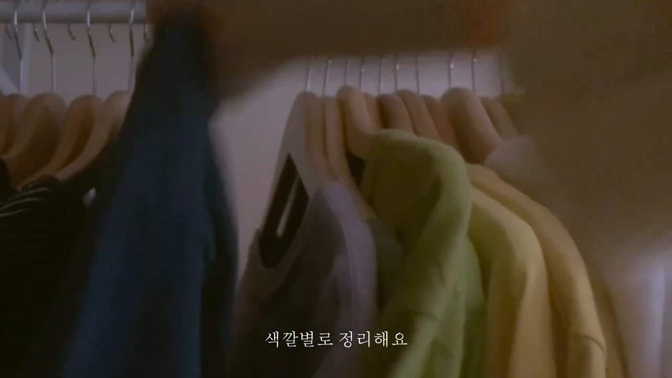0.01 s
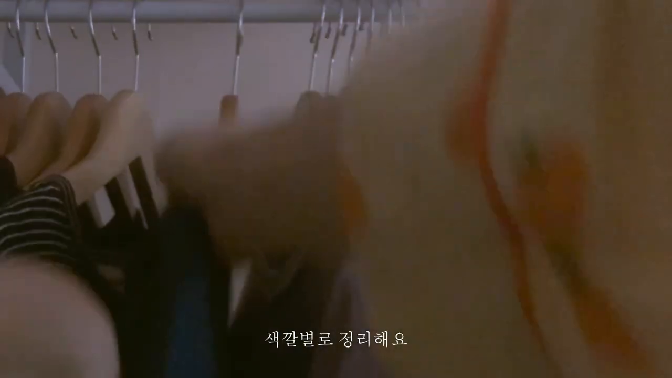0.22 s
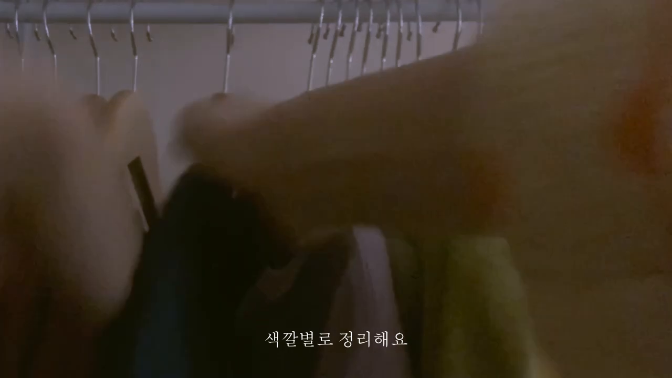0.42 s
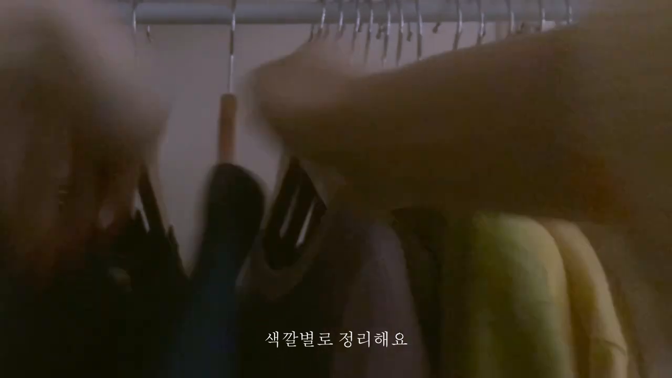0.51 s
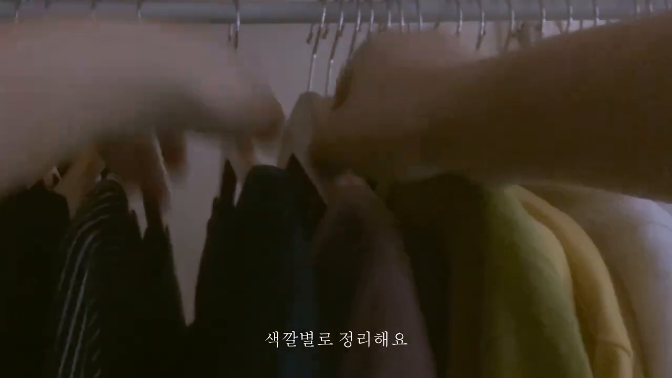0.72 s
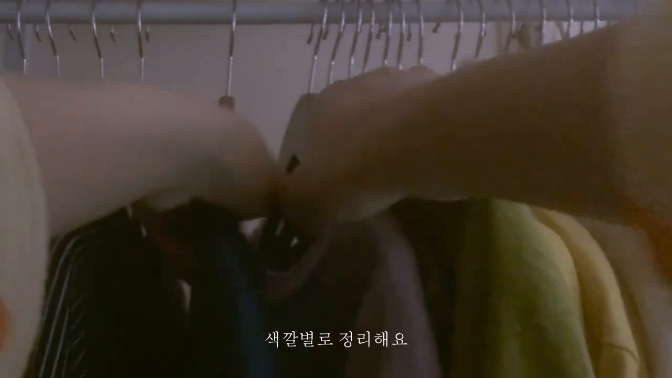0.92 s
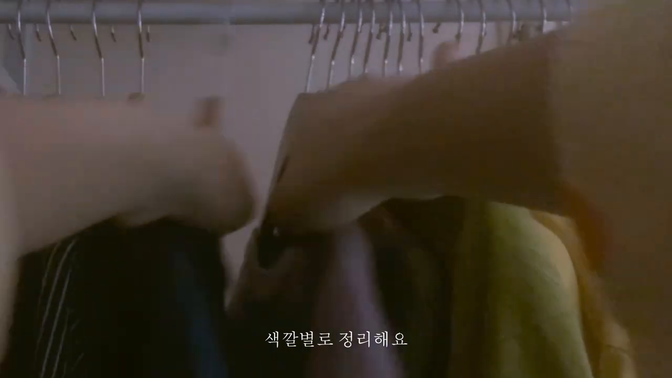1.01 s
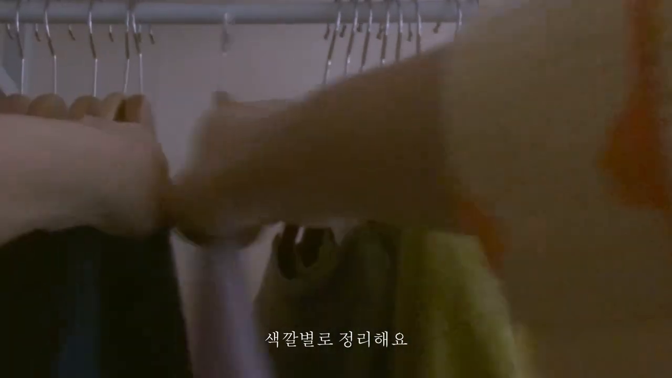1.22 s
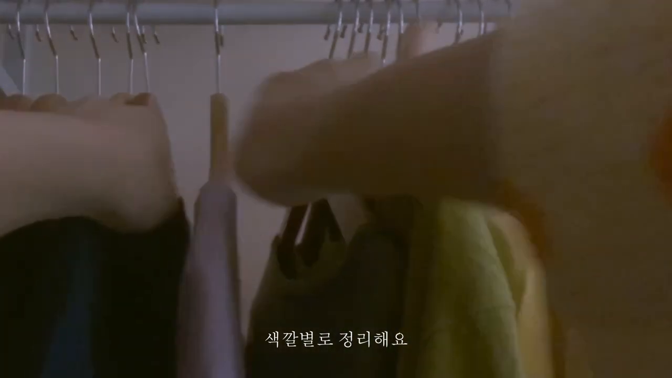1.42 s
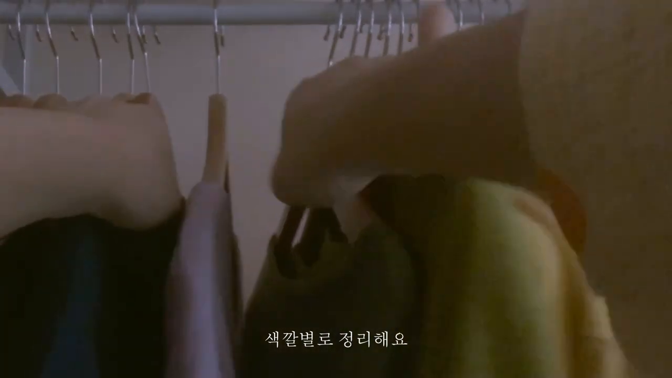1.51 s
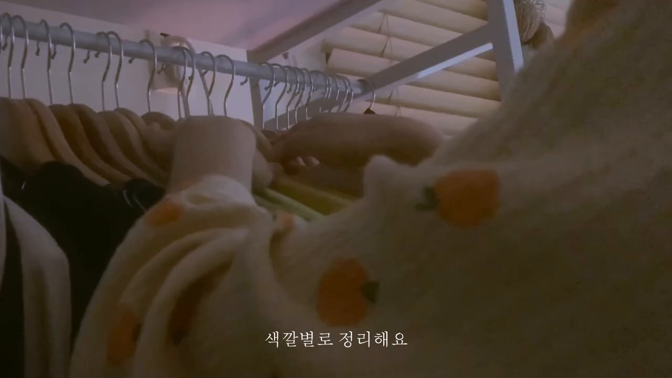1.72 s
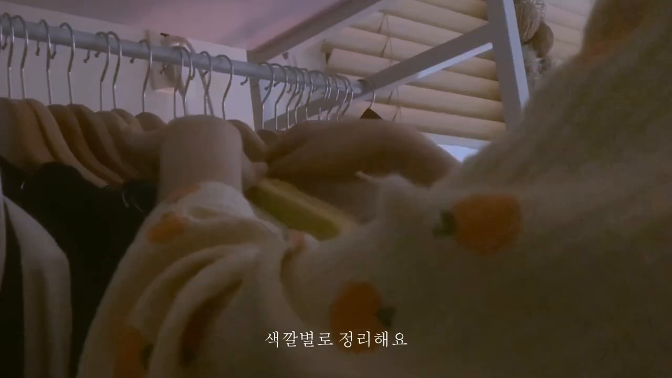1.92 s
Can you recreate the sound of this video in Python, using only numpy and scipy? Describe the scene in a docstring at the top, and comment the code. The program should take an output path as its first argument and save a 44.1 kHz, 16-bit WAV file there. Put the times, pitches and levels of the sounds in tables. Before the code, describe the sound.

Wooden clothes hangers are pushed along a metal rail, heard close in a small room. Hooks tick and a loud, hollow clack lands at 0.23 s, with weaker knocks near 0.45 and a dull tap at 0.56. A hook scrapes and clinks around 1.1, scraping again before a cushioned knock at 1.25. Cloth rustles, faint taps follow near 1.5 and 1.9; low air rush dips briefly at 1.79.

```python
"""Hangers on a rail

In a small room, close to the microphones, wooden hangers are pushed along a metal clothes rail.
Steel hooks tick just before wooden shoulders clack: noise cracks over damped sines, with a low hollow ring.
A hook scrapes along the rail (random slips through resonances) and clinks; cloth-cushioned taps are duller.
Clothes bump and rustle as shaped noise over a low rush of air and faint hiss, whose level dips briefly.
All but the clothes and the air excite a diffuse room tail."""
import sys
import numpy as np
from scipy import signal
from scipy.fft import rfft, irfft
from scipy.io import wavfile

SR = 44100
rng = np.random.default_rng(int(sys.argv[2]) if len(sys.argv) > 2 else 0)


def to_wav(s):
    """Save 16-bit WAV."""
    ch = np.atleast_2d(s).T  # columns
    pcm = np.round(np.clip(ch, -1, 1) * 32767)  # PCM
    wavfile.write(sys.argv[1], SR, pcm.astype(np.int16))


N = 88200
T = np.arange(N) / SR
FREQS = np.maximum(np.arange(N // 2 + 1) * SR / N, 1)
LEFT_RIGHT = np.array([[1], [-1]])
RIGHT_ONLY = np.array([[0], [1]])


def from_db(db):
    """Decibels to gain."""
    return 10 ** (np.asarray(db) / 20)


def rms_one(x):
    """Scale to unit rms."""
    return x / np.sqrt(np.mean(x ** 2) + 1e-20)


def at_hz(points, hz):
    """Read a table on a log-frequency axis."""
    points = np.array(points)
    return np.interp(np.log(hz), np.log(points[:, 0]), points[:, 1])


def pan(db):
    """Left and right gains for a level difference."""
    return from_db(db * LEFT_RIGHT / 2)


def noise(spectrum, likeness, tilt_db=0, lag_s=0):
    """Coloured stereo noise, rms 1, reaching the right microphone lag_s after the left."""
    mid, side = rfft(rng.standard_normal((2, N)))
    alike = np.clip(at_hz(likeness, FREQS), -1, 1)
    stereo = np.sqrt(1 + alike) * mid + np.sqrt(1 - alike) * side * LEFT_RIGHT
    colour = from_db(at_hz(spectrum, FREQS) + tilt_db * np.log2(FREQS))
    delay = np.exp(-2j * np.pi * FREQS * RIGHT_ONLY * lag_s)
    return rms_one(irfft(colour * delay * stereo, N))


def decay(start, t60, attack_s):
    """A quick rise and an exponential fall of 60 dB per t60."""
    age = np.maximum(T - start, 0)
    fall = from_db(-60 * np.minimum(age / t60, 5))
    return (1 - np.exp(-age / attack_s)) * fall


MODE_PAN_DB = 1  # random level difference per mode, multiplied by the phase scatter


def struck(start, modes, lag_s, attack_s, tilt_db=0, scatter=0):
    """Damped sines from one contact; scatter [rad per kHz] varies phase at the right microphone, and level."""
    age = T - start - RIGHT_ONLY * lag_s
    centre = np.mean([mode[0] for mode in modes])
    out = 0
    for hz, db, t60 in modes:
        turn, side = rng.standard_normal(2)
        phase = RIGHT_ONLY * turn * scatter * hz / 1000
        gain = from_db(db + tilt_db * np.log2(hz / centre)) * pan(side * scatter * MODE_PAN_DB)
        out = out + gain * decay(start, t60, attack_s) * np.sin(2 * np.pi * hz * age + phase)
    return out


def resonate(x, hz, width_hz):
    """One driven resonance, rms 1."""
    r = np.exp(-np.pi * width_hz / SR)
    feedback = [1, -2 * r * np.cos(2 * np.pi * hz / SR), r * r]
    return rms_one(signal.lfilter([1, 0, -1], feedback, x + 1e-18))


# Rush of air: (frequency [Hz], relative density [dB per Hz])
AIR = [(20, -37.5), (35, -20), (56, 4), (110, -6), (160, 2.5), (220, -8.5), (350, -7), (700, -13.5),
       (1400, -20), (2400, -32.5), (6000, -43.5), (16000, -71)]
# Faint hiss, which dips less than the rush: (frequency [Hz], relative density [dB per Hz])
HISS = [(500, -5.5), (2400, 0), (6000, -5.5), (9500, 2.5), (11500, -11), (14000, -1.5), (16000, -13)]
# Background level, with a brief dip: (time [s], level change [dB])
AIR_LEVEL = [(0, 2), (.8, 0), (1.4, 2), (1.772, -0.5), (1.789, -27), (1.812, -2), (2, 0.5)]
# Likeness of the background at the two microphones: (frequency [Hz], likeness [-1 to 1])
AIR_LIKENESS = [(40, .87), (130, .75), (250, .65), (800, .45), (2500, .1), (10000, .2)]
AIR_DB, HISS_DB = -60, -80.5
HISS_DIP_SHARE = 0.34  # part of the level change [dB] that the hiss follows
AIR_LAG_S = .00018


def air():
    """The low rush and faint hiss are coloured noises; the hiss follows the level changes and dip only partly."""
    level_db = np.interp(T, *np.transpose(AIR_LEVEL))
    rush = from_db(AIR_DB + level_db) * noise(AIR, AIR_LIKENESS, lag_s=AIR_LAG_S)
    hiss = from_db(HISS_DB + HISS_DIP_SHARE * level_db) * noise(HISS, AIR_LIKENESS)
    return rush + hiss


# Hooks tick against each other: (time [s], level [dB], steel ring level [dB])
TICKS = [(0.2252, -17, -17), (0.2269, -23, -25), (0.447, -36, -61), (0.463, -36, -64), (1.8915, -45.5, -65)]
# Dense, short-lived hook modes: (frequency [Hz], relative density [dB per Hz])
HOOK_CRACK = [(500, -18.5), (1500, -7.5), (3200, -3.5), (5500, -12.5), (8000, -1), (9400, 1.5), (10500, 0),
              (11400, -24), (12600, -4), (14500, -6.5), (16000, -18)]
# High ring of the steel hooks: (frequency [Hz], level [dB], 60 dB decay time [s])
HOOK_MODES = [(8400, -9, .025), (8750, -7, .03), (9041, -3, .04), (9200, -8, .035), (9364, -2, .04),
              (9600, -8, .03), (9904, -2, .04), (10250, -9, .025)]
# Likeness of a tick at the two microphones: (frequency [Hz], likeness, limited to [-1 to 1])
TICK_LIKENESS = [(500, -0.075), (1400, -1.1), (3000, -1.1), (6000, -0.47), (8300, 0.99), (10300, 0.97),
                 (13000, 0)]
TICK_SNAP_T60_S, TICK_T60_S, TICK_TAIL_DB = .007, .04, -9  # tail level relative to the snap


def hook_ticks():
    """Steel wire on steel wire: a sharp tick with a softer tail and a very high ring."""
    out = 0
    for s, db, ring_db in TICKS:
        snap = decay(s, TICK_SNAP_T60_S, .0002)
        tail = from_db(TICK_TAIL_DB) * decay(s, TICK_T60_S, 0.0015)
        crack = from_db(db) * noise(HOOK_CRACK, TICK_LIKENESS) * (snap + tail)
        out = out + crack + from_db(ring_db) * struck(s, HOOK_MODES, 0, .0004)
    return out


# Reverberation time: (frequency [Hz], 60 dB decay time [s])
ROOM_T60 = [(150, 1), (550, 0.65), (1900, 0.34), (3200, 0.39), (6000, 0.3), (9500, 0.27), (15000, 0.23)]
# Reverberation colour: (frequency [Hz], level [dB])
ROOM_COLOUR = [(150, 0.5), (400, 4.5), (550, -2), (1000, -1), (2000, -1.5), (3200, 1), (5000, 3),
               (9500, -1.5), (11600, -6), (14000, 2)]
# Likeness of the tail at the two microphones: (frequency [Hz], likeness [-1 to 1])
ROOM_LIKENESS = [(150, 1), (550, 0.69), (1300, -0.3), (5000, 0.067), (9500, 0.27), (14000, 0.35)]


def room(x):
    """A diffuse tail of noise that dies at its own rate in each band."""
    edges = np.geomspace(100, 18000, 14)
    t, response = T[:SR], 0
    diffuse = [noise(ROOM_COLOUR, ROOM_LIKENESS)[:, :SR] for _ in range(2)]
    for k, (low, high) in enumerate(zip(edges, edges[1:])):
        band_filter = signal.butter(2, [low, high], "band", fs=SR, output="sos")
        band = signal.sosfilt(band_filter, diffuse[k % 2])  # neighbouring bands use separate noises
        t60 = at_hz(ROOM_T60, np.sqrt(low * high))
        fall = np.exp(-np.log(1000) * t / t60) * (1 - np.exp(-t / .004))
        response = response + band * fall / np.linalg.norm(fall)
    return signal.fftconvolve(x, response, axes=1)[:, :N]


# Wooden shoulders meet, and at 1.105 s the hanger rings as its hook lands on the rail: (time [s], crack level
# [dB], wood ring level [dB], hollow ring level [dB], # neighbour's ring level [dB], treble tilt [dB per
# octave])
KNOCKS = [(0.229, -22.5, -23, -24, -53, -2.5), (0.233, -20, -23, -15, -42, -2.5),
          (0.2418, -27, -31.5, -45, -49, 7), (.4475, -35, -39.5, -47, -55, 3),
          (.456, -43.5, -42.5, -40.5, -53, -0.5), (.4655, -33.5, -38.5, -35.5, -38.5, 1.5),
          (1.105, -53, -37, -53.5, -49.5, 2.5), (1.259, -43.5, -47.5, -44, -52, -1.5),
          (1.774, -66.5, -80, -91, -80, 5)]
# Dense, short-lived wood modes: (frequency [Hz], relative density [dB per Hz])
WOOD_CRACK = [(150, -30), (400, -5), (700, -4.5), (1400, -4.5), (1950, -10.5), (2600, 1.5), (3250, -0.5),
              (4100, -11.5), (7000, -12.5), (10000, -17.5), (11500, -33), (14500, -31.5)]
# Bright wood ring: (frequency [Hz], level [dB], 60 dB decay time [s])
WOOD_MODES = [(1098, -9, .09), (1304, -9.5, .13), (1375, -17, .06), (1650, -12, .06), (1770, -15, .06),
              (2162, -11.5, .1), (2514, -10, .12), (2609, -11, .12), (2705, -15, .16), (2977, -14, .16),
              (3169, -14, .17), (3290, -15, .2), (3805, -24, .16)]
# Ring of the neighbouring hanger: (frequency [Hz], level [dB], 60 dB decay time [s])
NEIGHBOUR_MODES = [(421, -9, .12), (923, -3, .2), (1062, -3, .14), (1825, -9, .08), (2400, -8, .07),
                   (2690, -4, .1), (2985, -3, .14), (3250, -5, .08), (3318, 0, .13), (3790, -6, .08),
                   (3928, -8, .06), (4860, -14, .05), (6897, -8, .04)]
# Likeness of the wood noise at the two microphones: (frequency [Hz], likeness [-1 to 1])
WOOD_LIKENESS = [(100, 0.28), (500, .8), (1300, 0.18), (3000, 0.13), (9000, .1)]
WOOD_T60_S, WOOD_LAG_S = 0.064, 0.00018
PHASE_SCATTER_PER_KHZ = 0.42  # radians per kHz


def wood_knocks():
    """Each clack is a short crack, the bright wood modes and the ring of the neighbouring hanger."""
    out = 0
    for s, crack_db, ring_db, _, neighbour_db, tilt_db in KNOCKS:
        crack = noise(WOOD_CRACK, WOOD_LIKENESS, tilt_db, WOOD_LAG_S) * decay(s, WOOD_T60_S, .0015)
        ring = struck(s, WOOD_MODES, WOOD_LAG_S, 0.0015, tilt_db, PHASE_SCATTER_PER_KHZ)
        neighbour = struck(s, NEIGHBOUR_MODES, WOOD_LAG_S, .003, scatter=PHASE_SCATTER_PER_KHZ)
        out = out + from_db(crack_db) * crack + from_db(ring_db) * ring + from_db(neighbour_db) * neighbour
    return out


# Bending modes of the whole hanger: (frequency [Hz], level [dB], 60 dB decay time [s])
HOLLOW_MODES = [(316, -22, .2), (385, -28, .22), (440, -24, .2), (500, -10, .05), (555, 0, .105),
                (549, -15, .3), (592, -20, .2), (635, -11, .07), (690, -20, .14), (724, -20, .18),
                (769, -16, .2)]
HOLLOW_PAN_DB, HOLLOW_LAG_S = 3.2, .00022  # louder and earlier at the left microphone


def hollow_notes():
    """The same clacks set the whole hanger bending in a low, hollow note."""
    notes = 0
    for s, _, _, hollow_db, _, _ in KNOCKS:
        notes = notes + from_db(hollow_db) * struck(s, HOLLOW_MODES, HOLLOW_LAG_S, 0.0029)
    return notes * pan(HOLLOW_PAN_DB)


# Clothes bump: (time [s], level [dB])
BUMPS = [(.243, -39.5), (0.45, -42), (1.257, -40.5), (1.315, -67.5), (0.67, -68)]
# Cloth brushes past: (start time [s], 60 dB decay time [s], level [dB])
RUSTLES = [(.425, 0.19, -51.5), (.71, 0.091, -55), (.92, 0.37, -60), (1.29, 0.18, -44.5),
           (1.6, 0.39, -53.5), (1.72, 0.068, -71), (1.925, 0.29, -53)]
# Soft thud of a garment: (frequency [Hz], relative density [dB per Hz])
BUMP = [(20, -36), (36, -14), (60, 1.5), (130, -2), (220, -9), (500, -22), (2000, -67.5)]
# Rustle of cloth: (frequency [Hz], relative density [dB per Hz])
CLOTH = [(150, 8), (500, -13.5), (900, 3.5), (1500, 7.5), (2200, -14.5), (5000, -28), (14000, -41)]
BUMP_T60_S, RUSTLE_ATTACK_S = .25, 0.013


def clothes():
    """Soft bumps of hanging garments are low noise bursts, and brushes of cloth are brighter ones."""
    bumps = sum(from_db(db) * decay(s, BUMP_T60_S, .008) for s, db in BUMPS)
    brushes = sum(from_db(db) * decay(s, t60, RUSTLE_ATTACK_S) for s, t60, db in RUSTLES)
    thuds = bumps * noise(BUMP, AIR_LIKENESS, lag_s=AIR_LAG_S)
    return thuds + brushes * noise(CLOTH, AIR_LIKENESS, lag_s=AIR_LAG_S)


# Duller taps, cushioned by cloth: (time [s], level [dB], treble tilt [dB per octave])
TAPS = [(.563, -46, -2), (1.2538, -35.5, -2.5), (1.4919, -50, -2.7), (1.893, -53, 1.5)]
# Colour of a tap: (frequency [Hz], relative density [dB per Hz])
TAP = [(200, -9.5), (700, -8.5), (1100, 0.5), (1850, 4.5), (2400, 2.5), (2750, -5.5), (3300, -5.5),
       (4300, -10), (6000, -15), (10000, -19.5), (15000, -59)]
TAP_T60_S = .11


def dull_taps():
    """Hangers meet through their clothes, so each tap is a noise burst with no separate ring."""
    out = 0
    for s, db, tilt_db in TAPS:
        burst = noise(TAP, WOOD_LIKENESS, tilt_db, WOOD_LAG_S)
        out = out + from_db(db) * burst * decay(s, TAP_T60_S, 0.0013)
    return out


# A hook slides on the rail: (start time [s], length [s], level [dB], hanger ring level [dB], pitch [ratio])
SLIDES = [(1.033, .06, -46.5, -50, 1.12), (1.169, 0.042, -42, -60, 1)]
# Resonances of a sliding hook: (frequency [Hz], width [Hz], level [dB])
SLIDE_MODES = [(1070, 70, -10), (1180, 70, -10), (2900, 120, -9), (3240, 90, -4), (3345, 55, 0),
               (3630, 60, -7), (4860, 160, -12), (5940, 50, -13), (6580, 50, -8), (6930, 50, -11),
               (7260, 130, -8), (8942, 60, -4), (9200, 100, -9)]
# Scraping noise: (frequency [Hz], relative density [dB per Hz])
SCRAPE = [(400, -2.5), (1800, -1.5), (3300, 2), (5500, -6), (7200, -3.5), (10200, -5.5), (11500, -34),
          (13500, -17), (16000, -36)]
# Likeness of scrape and clink noise at the two microphones: (frequency [Hz], likeness, limited to [-1 to 1])
HIT_LIKENESS = [(100, .8), (500, .65), (1300, .15), (3000, -.15), (6000, -0.79), (9000, .7), (13000, -1.3)]
SLIDE_ATTACK_S, SLIDE_RELEASE_S = 0.026, 0.026
SLIPS_PER_S, SCRAPE_DB = 1400, -3  # average slip rate; scrape level relative to the resonances
SLIDE_FLUTTER_DB, FLUTTER_HZ = 1.3, 110
HANGER_NOTE_HZ = 554


def hook_slides():
    """Tiny random slips drive the hook's resonances with a fluttering grip, and the hanger hums below."""
    slips = (rng.random((2, N)) < SLIPS_PER_S / SR) * rng.standard_normal((2, N))
    flutter_filter = signal.butter(2, FLUTTER_HZ, fs=SR, output="sos")
    flutter = rms_one(signal.sosfilt(flutter_filter, rng.standard_normal(N)))
    grip = rms_one(from_db(SLIDE_FLUTTER_DB * flutter))
    hum = np.sin(2 * np.pi * HANGER_NOTE_HZ * (T - RIGHT_ONLY * HOLLOW_LAG_S))
    hanger = hum * pan(HOLLOW_PAN_DB)
    out = 0
    for s, length, db, hanger_db, ratio in SLIDES:
        steel = 0
        for hz, width, mode_db in SLIDE_MODES:
            steel = steel + from_db(mode_db) * resonate(slips, hz * ratio, width)
        steel = rms_one(rms_one(steel) + from_db(SCRAPE_DB) * noise(SCRAPE, HIT_LIKENESS))
        rise = np.clip((T - s) / SLIDE_ATTACK_S, 0, 1)
        push = rise * np.exp(-np.maximum(T - s - length, 0) / SLIDE_RELEASE_S)
        out = out + push * grip * (from_db(db) * steel + from_db(hanger_db) * hanger)
    return out


# Dense, short-lived rail modes: (frequency [Hz], relative density [dB per Hz])
RAIL_CRACK = [(400, -29.5), (1200, -8), (2400, -3), (3800, -5.5), (5000, 3), (7500, -17), (9700, 4.5),
              (11500, -9.5), (13800, 2.5), (15500, -13), (16500, -19)]
# Ring of the rail: (frequency [Hz], level [dB], 60 dB decay time [s])
RAIL_MODES = [(2390, -10, .05), (4810, -5, .028), (4860, -3, .045), (5230, -12, .04), (9252, -7, .05),
              (9848, -4, .035), (10325, -11, .035), (12420, -11, .025), (13000, -12, .025),
              (13480, -9, .03), (14300, -9, .025), (15200, -12, .02)]
CLINK_S, CLINK_DB, CLINK_T60_S = 1.0972, -25.5, 0.053
RAIL_CRACK_DB, RAIL_LAG_S = 1.5, .00002  # crack level relative to the clink


def rail_clink():
    """The sliding hook lands on the rail: a noise crack and damped metal modes."""
    crack = from_db(RAIL_CRACK_DB) * noise(RAIL_CRACK, HIT_LIKENESS) * decay(CLINK_S, CLINK_T60_S, .0004)
    return from_db(CLINK_DB) * (crack + struck(CLINK_S, RAIL_MODES, RAIL_LAG_S, .0005))


def scene():
    """Hangers close by, their reverberation, and the clothes and air without added reverberation."""
    sources = [  # (sound, level sent to the room [dB])
        (hook_ticks(), -7),
        (wood_knocks(), -5.5),
        (hollow_notes(), -17),
        (dull_taps(), -4),
        (hook_slides(), -8),
        (rail_clink(), -10),
    ]
    direct = sum(sound for sound, _ in sources)
    tail = room(sum(from_db(room_db) * sound for sound, room_db in sources))
    return direct + tail + clothes() + air()


RUMBLE_CUT_HZ, CUTOFF_HZ = 36, 16300


def record(dry):
    """Rumble is removed and the top is cut steeply."""
    low_cut = signal.butter(2, RUMBLE_CUT_HZ, "high", fs=SR, output="sos")
    top_cut = signal.ellip(10, .2, 80, CUTOFF_HZ, fs=SR, output="sos")
    return signal.sosfilt(top_cut, signal.sosfilt(low_cut, dry))


dry = scene()
out = record(dry)
to_wav(out)
```